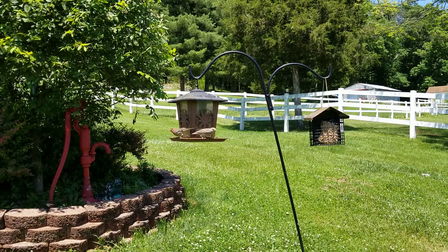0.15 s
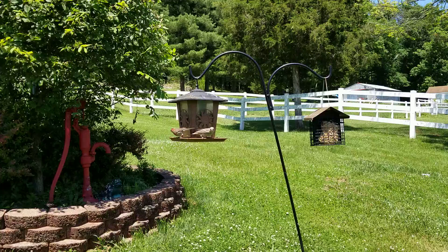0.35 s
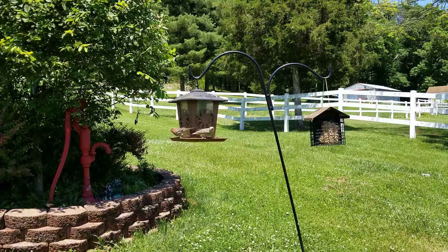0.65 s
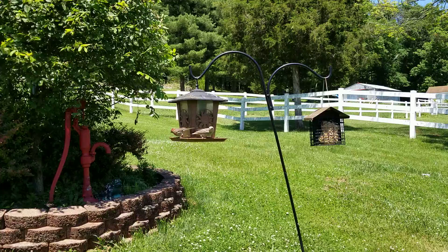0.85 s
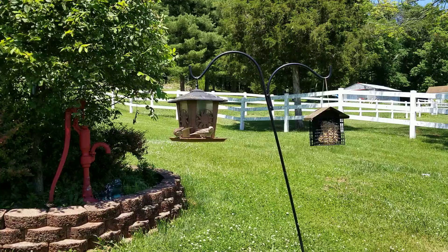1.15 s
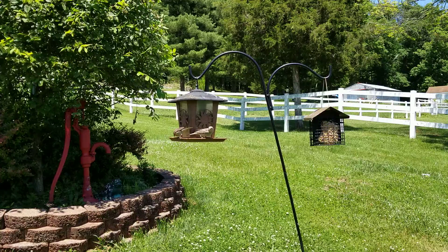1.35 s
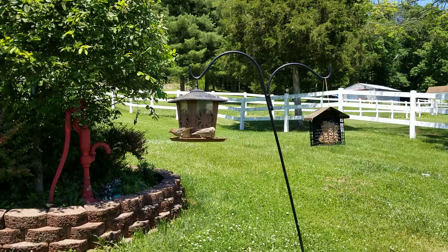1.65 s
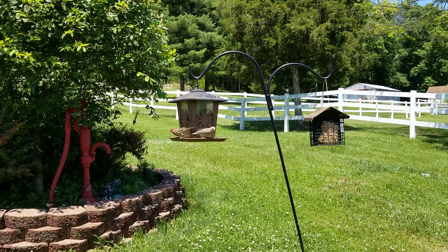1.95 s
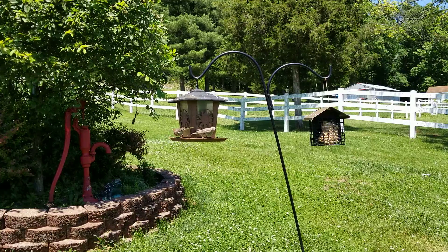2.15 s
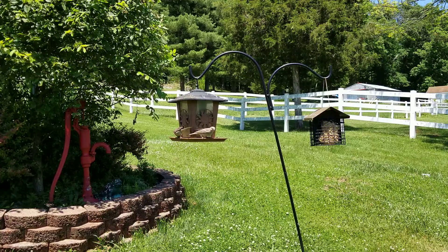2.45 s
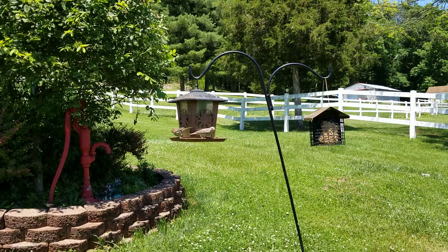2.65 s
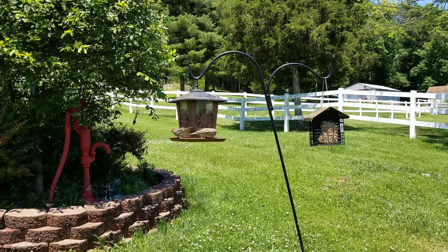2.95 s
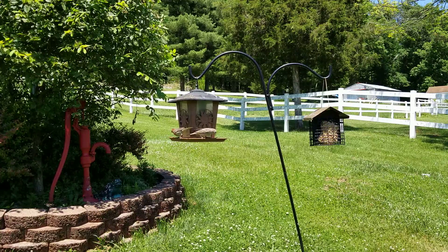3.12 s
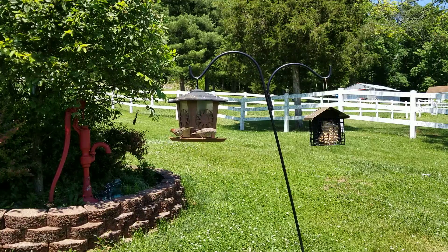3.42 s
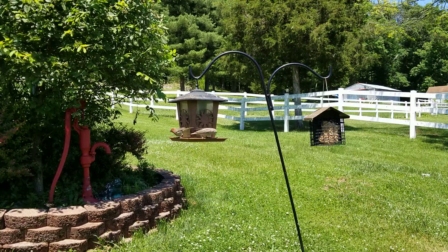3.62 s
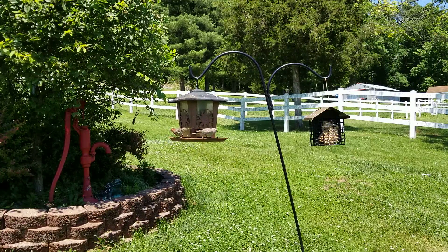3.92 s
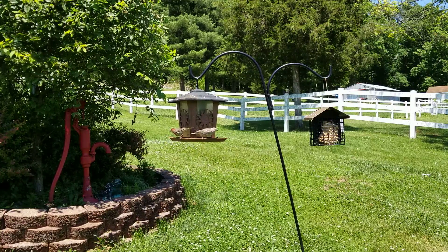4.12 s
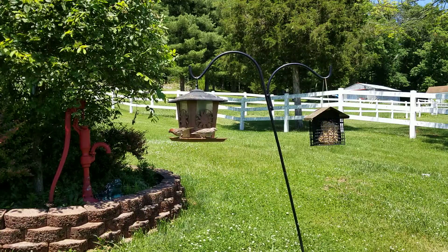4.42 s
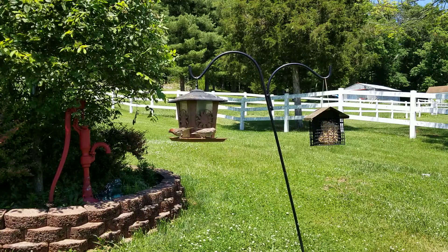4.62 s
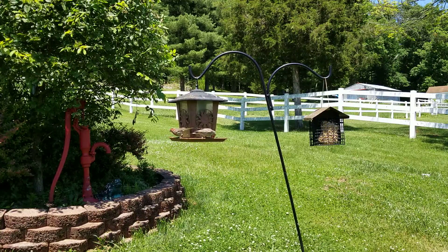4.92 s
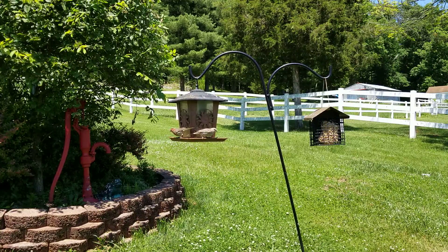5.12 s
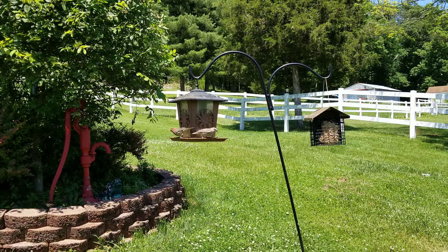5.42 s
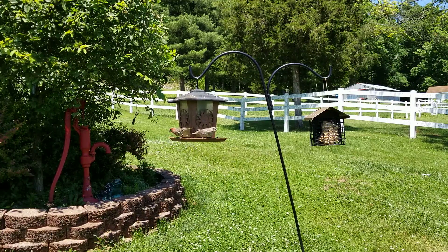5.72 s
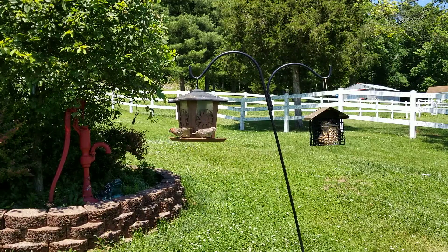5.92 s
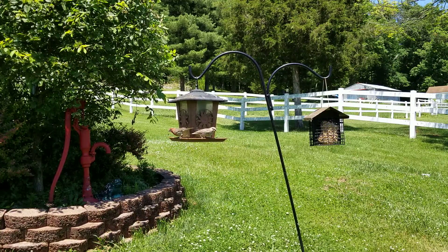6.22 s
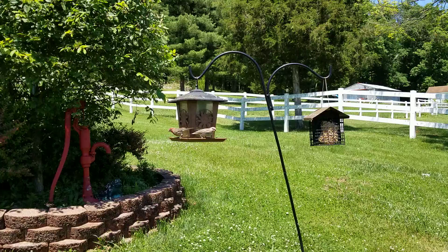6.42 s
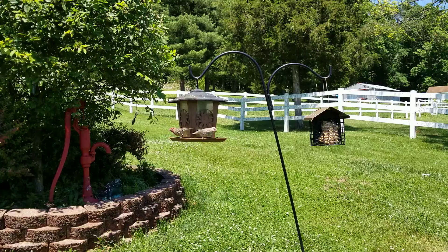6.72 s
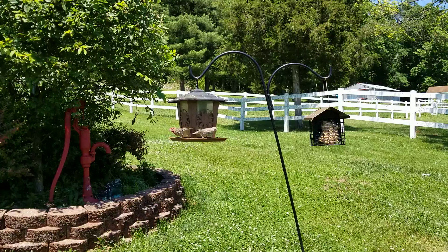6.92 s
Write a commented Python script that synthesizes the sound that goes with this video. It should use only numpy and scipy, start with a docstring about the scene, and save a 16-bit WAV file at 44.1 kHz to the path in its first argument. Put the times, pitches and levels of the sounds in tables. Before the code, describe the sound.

In an open backyard, a close finch chirps four times while seeds tick, far birds whistle and wind buffets the microphone.

```python
"""Wind rumbles on the microphone over a faint hiss in a backyard: noise bands that swell and flutter.
A finch at the feeder, left of the microphone, chirps four times: two coupled voices of its syrinx, with echoes.
Seeds crack as short damped tones; farther birds whistle, slur and tsip as gliding tones among echoing trees.
Far away an animal yelps and howls, made the same way."""
import sys
import numpy as np
from scipy import signal
from scipy.fft import rfft, irfft, next_fast_len
from scipy.io import wavfile
from scipy.ndimage import uniform_filter1d, map_coordinates

SR = 44100
rng = np.random.default_rng(int(sys.argv[2]) if len(sys.argv) > 2 else 0)


def bounce(signal):
    """Save signal as a 16-bit WAV file at the path given by the first command-line argument."""
    frames = np.transpose(np.atleast_2d(signal))
    limited = np.clip(frames, -1, 1)
    pcm = np.round(limited * 32767).astype(np.int16)
    wavfile.write(sys.argv[1], SR, pcm)


N = 311346  # length in samples

LEAD_S = .044  # a chirp's lead-in before the top of its rise


def amp(db):
    """Decibels to gain."""
    return 10 ** (np.asarray(db) / 20)


def unit(x):
    """Scale to rms 1."""
    return x / np.sqrt(np.mean(x ** 2) + 1e-20)


def along(points, hz):
    """(Hz, value) points read on a log axis."""
    f, v = np.transpose(points)
    return np.interp(np.log(hz + 1), np.log(f + 1), v)


def curves(rows):
    """One value per sample of the scene for each column after the time."""
    s, *cols = np.transpose(rows)
    return [np.interp(np.arange(N) / SR, s, c) for c in cols]


def gesture(rows):
    """The columns of one short note, per sample, with rounded corners."""
    s, *cols = np.transpose(rows)
    t = np.arange(s[0], s[-1], 1 / SR)
    return [uniform_filter1d(np.interp(t, s, c), size=120) for c in cols]


def wobble(rate, n):
    """A smooth random curve, rate knots a second."""
    knots = rng.standard_normal(int(n * rate / SR) + 4)
    return map_coordinates(knots, [np.arange(n) * rate / SR])


def add(track, s, sound):
    """Mix a sound into a track at time s."""
    part = track[max(round(s * SR), 0):][:len(sound)]
    part += sound[:len(part)]


def filtered(x, response):
    """Shape the spectrum of x by a response of frequency."""
    m = next_fast_len(N + SR // 2)
    hz = np.fft.rfftfreq(m, 1 / SR)
    return irfft(rfft(x, m) * response(hz), m)[..., :N]


def noise(colour):
    """Stereo noise of rms 1, alike in the bass and nearly unrelated in the treble."""
    # Left-right likeness of the sound field. Each row: frequency in Hz, correlation from 0 to 1.
    likeness = [(60, 1), (150, 0.96), (350, 0.83), (700, 0.15), (1500, 0), (12000, 0.0079)]

    def mid_side(hz):
        turn = np.arccos(np.clip(along(likeness, hz), -1, 1)) / 2
        return amp(along(colour, hz)) * [np.cos(turn), np.sin(turn)]

    mid, side = filtered(rng.standard_normal((2, N)), mid_side)
    return unit(np.array([mid + side, mid - side]))


def even(x):
    """Noise with its own slow swells evened out."""
    power = uniform_filter1d(np.mean(x ** 2, axis=0), size=7000)
    return x / np.sqrt(np.abs(power) + 1e-9)


def scatter(x, t60, rise):
    """Diffuse stereo echo that builds up and dies away; t60 and rise in seconds."""
    t = np.arange(2 * SR) / SR
    envelope = amp(-60 * t / t60) * (1 - np.exp(-t / rise))
    tail = rng.standard_normal((2, len(t))) * envelope
    return signal.fftconvolve(x[None], tail / np.linalg.norm(tail[0]), axes=1)[:, :N]


def leftward(x, right_db):
    """A source on the left is weaker in the right channel."""
    return x * amp([[0], [right_db]])


def finch():
    """Four near chirps, answered by walls, the bush and the tree line."""
    # The finch's chirps. Each row: top of the rise in seconds, hold after it in seconds,
    # low voice in Hz and high voice in Hz near the crest before drift and sag, drift of the low voice in Hz/s,
    # final sag of the high voice as a share of its pitch, settled throat resonance in Hz,
    # level in dB and lead-in level in dB, both before the echoes and the right-channel shade.
    calls = [(1.626, 0.039, 1182, 5970, -400, 0.023, 4700, -44, -64),
             (3.857, .035, 1260, 5860, -2400, .09, 5160, -44.5, -72),
             (5.029, .042, 1319, 5980, 0, 0.062, 4150, -49, -69),
             (6.806, .033, 1213, 6020, 1307, 0.094, 5200, -46, -65)]
    # Echoes off nearby walls. Each row: mean delay in seconds, level in dB against the direct song.
    wall_echoes = [(0.015, -4), (0.034, -17), (.047, -9.5)]
    song, echoes = np.zeros(N), np.zeros((2, N))
    for s, *call in calls:
        voice = chirp(arch(*call), jitter=.004, flutter_db=1.5, rasp=.2, haze_db=-22.5,
                      throat_db=6, throat_width=700)
        add(song, s - LEAD_S, voice)
    for delay, db in wall_echoes:
        for side in echoes:
            add(side, delay + rng.normal(0, .0003), amp(db) * song)
    bush = amp(-13.0) * scatter(song, t60=0.28, rise=0.013)
    # right channel: (Hz, dB)
    shade = [(1200, -7.5), (2500, -19.0), (4700, -18.5), (6000, -20.0), (7500, -47), (12000, -12)]
    near = filtered(song + echoes + bush, lambda hz: amp([0 * hz, along(shade, hz)]))
    # fluttering leaves vary the level fast, which smears the pitch of the late echo
    trees = scatter(song * (1 + 1.1 * wobble(900, N)), t60=.6, rise=.05)
    return near + leftward(amp(-16) * trees, right_db=-20.5)


def arch(hold, low_hz, high_hz, drift, sag, throat_hz, db, lead_db):
    """Both voices, throat resonance and level of a chirp: pitches rise with effort, crest and sag."""
    rise_s, knee_s, crest_s = .021, .002, .013  # rise time constant, its rounding, crest after the top
    low_start, high_start = .47, .52  # starting pitch as a share of the crest
    low_ahead_s, low_sags = 0.0026, 1.2  # the low voice gets there first and sags further
    throat_rest_hz, overshoot_hz = 4520, 750
    throat_rise_s, throat_settle_s = 0.016, .012  # the throat tunes up with the rise, then settles
    full_before_s, attack_db_per_s = 0.0081, 1300  # the attack ends just before the top
    lead_db_per_s, arch_db = 380, 4  # lead-in swell; level lost from the crest to the end
    t = np.arange(-LEAD_S, hold, 1 / SR)

    def effort(ahead):
        return np.exp(-np.logaddexp(0, -(t + ahead) / knee_s) * knee_s / rise_s)

    past = (t - crest_s) / (hold - crest_s)  # 0 at the crest, 1 at the end
    droop = sag * np.maximum(past, 0) ** 2
    low = low_hz * (low_start + (1 - low_start) * effort(low_ahead_s) - low_sags * droop)
    low += drift * (t - crest_s)
    high = high_hz * (high_start + (1 - high_start) * effort(0) - droop)
    throat = np.interp(t, [-throat_rise_s, 0, throat_settle_s],
                       [throat_rest_hz, throat_hz + overshoot_hz, throat_hz])
    attack = attack_db_per_s * np.minimum(t + full_before_s, 0)
    body = db + attack - arch_db * np.minimum(past ** 2, 1)
    lead = lead_db + lead_db_per_s * (np.minimum(t, 0) + LEAD_S * 2 / 3)
    return low, high, throat, np.maximum(body, lead)


def chirp(shape, jitter, flutter_db, rasp, haze_db, throat_db, throat_width):
    """The low voice modulates the high one: harmonics of each, and sum and difference tones."""
    # Tones of the two coupled voices. Each row: multiple of the high voice, multiple of the low voice,
    # level in dB before slack, throat, beak and flutter.
    tones = [(0, 1, -9), (0, 2, -10.5), (0, 3, 0.5), (0, 4, -13), (1, -2, -38), (1, -1, -1.5), (1, 0, -1),
             (1, 1, -5.5), (1, 2, -15), (1, 3, -16.5), (2, -1, -18.5), (2, 0, -13.5), (2, 1, -16),
             (2, 2, -21.5)]
    # Colour of the beak. Each row: frequency in Hz, gain in dB.
    beak = [(700, 1), (1200, -3.5), (1700, 2.5), (2500, 0.5), (3100, -10), (3800, -13), (4700, 1),
            (5900, -1), (7200, 0.5), (8500, -3.5), (12000, 2), (15000, -4.5)]
    low, high, throat, db = shape
    n = len(db)
    # the low lead-in is unsteady and hazy, and the throat colours it more
    slack = (low.max() / low) ** 2
    waver = 1 + jitter * slack * wobble(700, n)
    low, high = low * waver, high * waver
    voice = np.zeros(n)
    for highs, lows, level in tones:
        hz = round(highs) * high + round(lows) * low
        detuning = (hz - throat) / (throat_width * slack)
        lift_db = slack * throat_db / (1 + detuning ** 2)
        flutter = flutter_db * wobble(120, n)
        gain = amp(level / np.sqrt(slack) + lift_db + along(beak, np.abs(hz)) + flutter)
        voice += gain * np.sin(2 * np.pi * (np.cumsum(hz) / SR + rng.random()))
    # alternate cycles of the low voice differ, which puts rough lines between the main ones
    voice *= 1 + rasp * wobble(400, n) * np.sin(np.pi * np.cumsum(low) / SR)
    # turbulence spreads a haze round every tone
    voice *= 1 + amp(haze_db) * slack * wobble(3000, n)
    # level out the sum, so that db alone sets the loudness
    voice /= np.sqrt(np.abs(uniform_filter1d(voice ** 2, size=500)) + 1e-9)
    return voice * amp(db) * signal.windows.tukey(n, .08)


def seeds():
    """Cracks and taps are tones that lose 60 dB in 2.1 ms, and the yard returns a soft splash."""
    # Seeds cracking and beaks tapping. Each row: start in seconds, peak in dB before the husk's colour,
    # centre frequency in Hz, echo in dB against the snap.
    cracks = [(0.7916, -36.5, 10800, -4), (1.014, -59, 10500, 6), (1.757, -43, 13100, -2),
              (3.214, -41, 13700, -14), (4.003, -53.5, 9150, -7), (4.125, -57, 10000, -14),
              (4.335, -64, 9400, 7), (4.962, -53.5, 10100, 6), (5.550, -52.5, 13500, -17.5),
              (5.604, -47.5, 12740, -12), (6.5747, -37.5, 13000, -7), (6.748, -46.5, 13400, 7.5)]
    # A small husk radiates little low sound. Each row: frequency in Hz, gain in dB.
    husk = [(2000, -16), (4500, -12.5), (6500, 0), (16000, 0.5)]
    direct, sent = np.zeros(N), np.zeros(N)
    t = np.arange(SR // 100) / SR
    for s, db, hz, echo_db in cracks:
        snap = amp(db - 60 * t / 0.0021) * np.cos(2 * np.pi * hz * t)
        add(direct, s, snap)
        add(sent, s, amp(echo_db) * snap)
    splash = scatter(sent, t60=0.27, rise=.004)
    snaps = filtered(direct + splash, lambda hz: amp(along(husk, hz)))
    return leftward(snaps, right_db=-21.5)


def far_voices():
    """Other birds around the yard, and a far animal's faint yelps and falling howl."""
    # Shapes of the notes: a bird's slur, whistle, drop, tsip, twitter and thin seet, an animal's howl and yelp.
    # Each row: seconds from the start, pitch in Hz before the pitch factor, level in dB against the note's.
    slur, whistle, drop, tsip = [(0, 4694, -14.5), (.018, 4400, -11), (.027, 3875, -3), (.045, 3460, -5.5),
                                 (.067, 3050, -15), (.081, 2840, -6.5)], [(0, 2628, -14), (.03, 2699, -2), (.065, 2698, -2.5),
                                               (.09, 2498, -7), (.125, 2343, -9.5)], [(0, 2690, -9.5), (.02, 2536, -1.5),
                                                                (.045, 2400, -3.5), (.07, 2270, -11.5)], [(0, 5200, -23),
                                                                              (.003, 6200, 1),
                                                                              (.007, 7350, 3),
                                                                              (.011, 8030, 3),
                                                                              (.018, 8000, -10)]
    twit, seet, howl, yelp = [(0, 9400, 0), (.005, 7000, 1), (.008, 6370, -4), (.012, 7600, -1),
                              (.016, 9380, -4)], [(0, 7500, 0), (.03, 7670, 0), (.07, 7640, -4), (.11, 7840, -1),
                                            (.18, 7850, -8), (.21, 7700, -0.5), (.29, 7650, -11)], [(0, 758.5, -6), (.04, 836, -2), (.12, 825, -7.5),
                                                          (.19, 751, -3), (.25, 664, -10.5),
                                                          (.32, 585, -6.5), (.41, 519, -10)], [(0, 705, -3.5), (.02, 676, 1.5),
                                                                        (.04, 697, 0.5), (.06, 635, -16)]
    # When each note sounds.
    # Each row: start in seconds, level in dB before the note's shape and the trees, pitch factor.
    slur_times, whistle_times, drop_times = [(1.199, -56, 0.96), (2.412, -56.5, 0.95), (4.101, -60, 0.94),
                                             (5.622, -62.5, 0.96), (6.782, -58, 1), (6.998, -62, .98)], [(1.89, -51, 1), (2.1, -52.5, 0.97),
                                                            (2.316, -53, 0.98), (6.621, -67, .95),
                                                            (6.786, -52.5, 1.005), (6.977, -54.5, 1.02)], [(1.725, -58.5, 1)]
    tsip_times, twit_times, seet_times = [(.131, -50.5, 0.99), (6.927, -73, 0.98)], [(2.547, -68.5, 0.96)], [(4.361, -77.5, 0.99)]
    howl_times, yelp_times = [(4.243, -61.5, 0.98)], [(1.205, -70, 1.05), (1.78, -69, 1.03), (2.175, -70.5, .91),
                                             (2.83, -73, 1.07)]

    slurs = notes(slur, slur_times, jitter=0.035)
    slurs = among_trees(slurs, direct_db=-5, echo_db=-6.5, t60=0.44, right_db=-18.5)

    song = notes(whistle, whistle_times, jitter=.009) + notes(drop, drop_times, jitter=.012)
    whistles = among_trees(song, direct_db=-5, echo_db=-0.5, t60=0.53, right_db=-13.5)
    # the wood rings on
    whistles += leftward(amp(-7) * scatter(song, t60=2.1, rise=0.072), right_db=-15)

    tsips = notes(tsip, tsip_times, jitter=.003) + notes(twit, twit_times, jitter=.003)
    tsips = among_trees(tsips, direct_db=-3.5, echo_db=-4, t60=0.61, right_db=-32)

    seets = notes(seet, seet_times, jitter=.012)
    seets = among_trees(seets, direct_db=-1, echo_db=-2.5, t60=.45, right_db=-26)

    animal = notes(howl, howl_times, jitter=0.031) + notes(yelp, yelp_times, jitter=0.021)
    animal = among_trees(animal, direct_db=-3, echo_db=-0.5, t60=0.73, right_db=-0.5)
    return slurs + whistles + tsips + seets + animal


def notes(shape, times, jitter):
    """Notes that follow one pitch and loudness gesture, husky where they are soft."""
    hz, db = gesture(shape)
    track, n = np.zeros(N), len(db)
    husky = jitter * (1 + (db.max() - db) / 6)
    for s, level, pitch in times:
        wavering_hz = hz * pitch * (1 + husky * wobble(1100, n))
        tone = np.sin(2 * np.pi * np.cumsum(wavering_hz) / SR)
        # root 2 makes the level an rms one
        add(track, s, np.sqrt(2) * amp(level + db) * tone * signal.windows.tukey(n, .1))
    return track


def among_trees(x, direct_db, echo_db, t60, right_db):
    """A far voice: partly direct, partly scattered by trunks and leaves."""
    echo = amp(echo_db) * scatter(x, t60, rise=0.0017)
    return leftward(amp(direct_db) * x + echo, right_db)


def wind():
    """Gusts on the microphone: a deep buffet, a rumble, a rush above it and small eddies on top."""
    # Noise colours of the four layers. Each row: frequency in Hz, relative density in dB per Hz.
    buffet, rumble, rush, eddies = [(15, -42.5), (27, -18.5), (34, 5), (39, 7), (45, 9.5), (55, -10.5),
                                    (80, -69), (200, -120)], [(20, -72), (38, -32), (48, -14.5), (55, 0), (61, 6.5),
                                                    (69, -4.5), (78, -11.5), (100, -46.5), (300, -120)], [(30, -70.5), (65, -25.5), (78, -1),
                                                                    (92, 2), (108, -7.5), (128, -13),
                                                                    (150, -27), (220, -58), (700, -120)], [(50, -72.5), (105, -10.5),
                                                                                  (126, 7), (160, -1),
                                                                                  (210, -1), (250, -5.5),
                                                                                  (300, -10), (365, -11.5),
                                                                                  (430, -16.5), (500, -20),
                                                                                  (750, -32.5), (1500, -62),
                                                                                  (6000, -120)]
    # How strongly each layer blows. Each row: time in seconds, level in dB before the trim and flutter.
    buffet_level, rumble_level = [(0.0, -50), (0.15, -40), (0.55, -44.5), (0.7, -56), (1.3, -43),
                                  (2.2, -48.5), (2.35, -55), (2.5, -47.5), (3.151, -55.5), (4.0, -41),
                                  (4.15, -49.5), (5.2, -42), (5.6, -32.5), (5.75, -38.5), (6.0, -28.5),
                                  (6.35, -43), (6.9, -46), (7.05, -48)], [(0.0, -48), (0.15, -32.5), (0.6, -42.5),
                                                        (0.75, -37.5), (1.2, -47.5), (2.6, -34),
                                                        (2.95, -51), (3.75, -41), (4.2, -54), (4.35, -43.0),
                                                        (4.5, -44.5), (5.25, -38.5), (5.8, -26),
                                                        (5.95, -38.5), (6.15, -35.0), (6.4, -47.5),
                                                        (6.9, -34.5), (7.05, -41.5)]
    rush_level = [(0.0, -47.5), (0.15, -42.5), (0.95, -44.5), (1.1, -47), (1.95, -51.5), (2.1, -43.5),
                  (2.45, -53.5), (3.1, -49.5), (3.25, -59), (3.4, -47), (4.25, -44.5), (4.5, -37.5),
                  (4.65, -44.5), (5.2, -38.5), (5.45, -51), (5.65, -37.5), (6.9, -50.0), (7.05, -43.0)]
    # Strength of the small eddies. Each row: time in seconds, level in dB before the trim.
    eddy_level = [(0.0, -53.5), (0.3, -54), (0.45, -55.5), (2.95, -54.5), (3.65, -51.5), (3.8, -53),
                  (4.25, -50), (4.85, -52), (5.5, -47), (5.75, -44.5), (6.4, -50), (7.05, -51.5)]
    eddy_db, = curves(eddy_level)
    low = gusting(buffet, buffet_level, trim_db=0.0) + gusting(rumble, rumble_level, trim_db=0.1)
    high = gusting(rush, rush_level, trim_db=0.6) + amp(eddy_db - 0.84) * noise(eddies)
    return low + high


def gusting(colour, level, trim_db):
    """One layer of wind: its noise follows the gusts and flutters at random."""
    flutter_per_s, flutter_db = 9, 0.73  # quick random swings
    db, = curves(level)
    flutter = flutter_db * wobble(flutter_per_s, N)
    return amp(db + trim_db + flutter) * even(noise(colour))


def background():
    """Distant foliage and birds as one steady noise, and the microphone's own hiss."""
    # Noise colours of the distance and of the hiss.
    # Each row: frequency in Hz, relative density in dB per Hz.
    air, hiss = [(200, -21.5), (400, 2), (520, 0.5), (700, -1), (850, -2.5), (1000, -7), (1700, -10.5),
                 (2550, -9.5), (3000, -13.5), (3600, -18), (4600, -18), (7000, -25), (9000, -28),
                 (20000, -91.5)], [(4000, -56), (7000, -40.5), (9000, -25), (10500, -11), (12000, -3.5),
                              (15700, -3), (16000, -17), (17000, -29)]
    distance = leftward(amp(-70.5) * noise(air), right_db=-3.5)
    return distance + amp(-72.0) * noise(hiss)


def scene():
    """All of the yard, left and right."""
    return finch() + far_voices() + seeds() + wind() + background()


def record(dry):
    """Very short fades at both ends, then a sharp cut at the recorder's band limit."""
    top_hz = 16700
    return filtered(dry * signal.windows.tukey(N, .001), lambda hz: hz < top_hz)


dry = scene()
out = record(dry)
bounce(out)
```